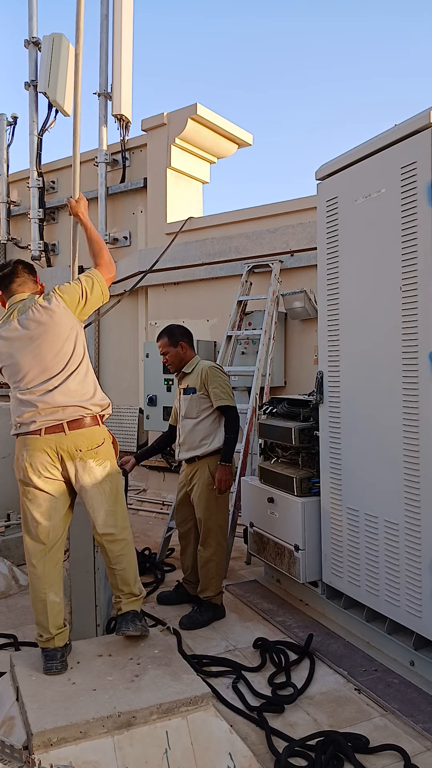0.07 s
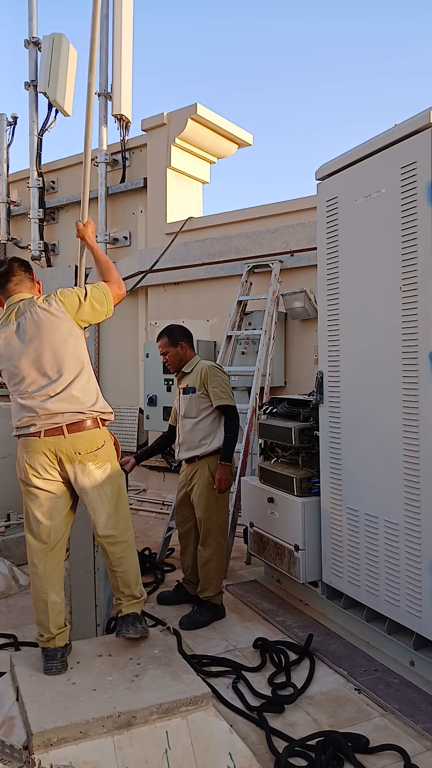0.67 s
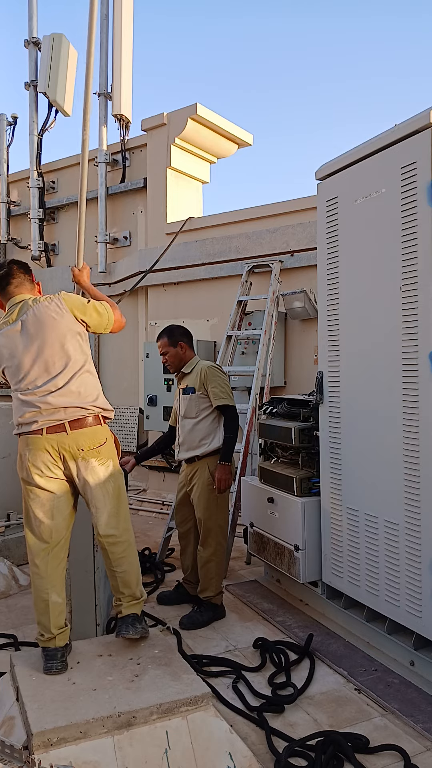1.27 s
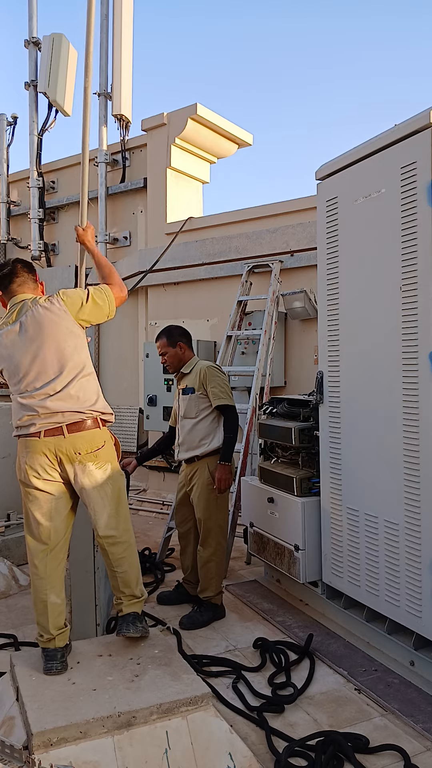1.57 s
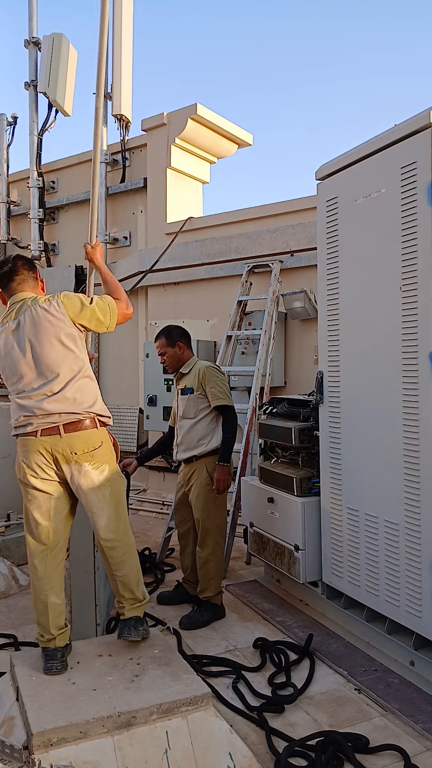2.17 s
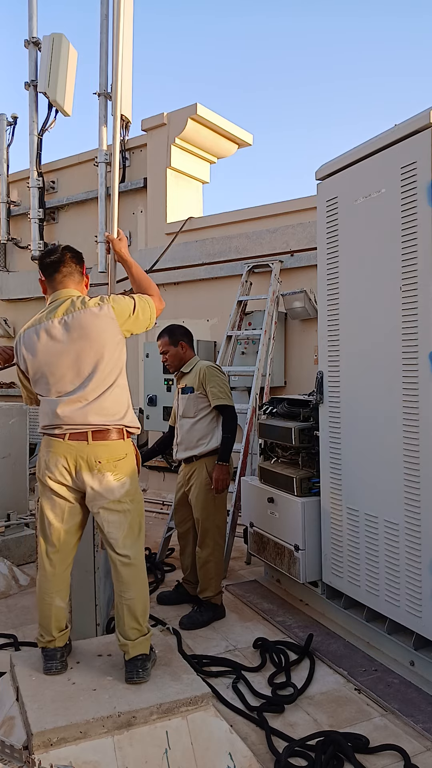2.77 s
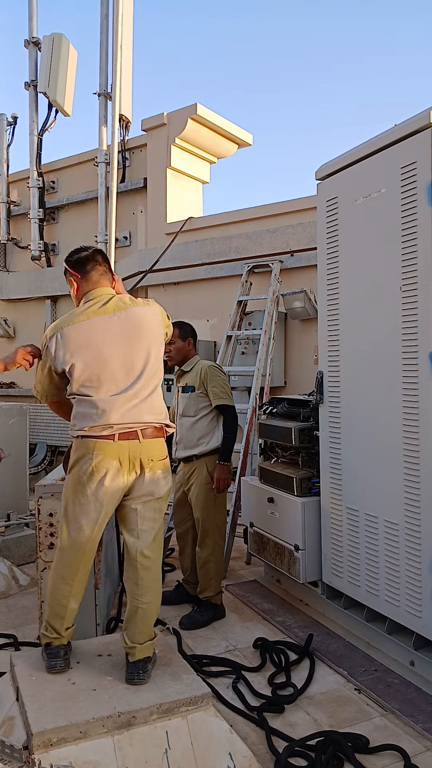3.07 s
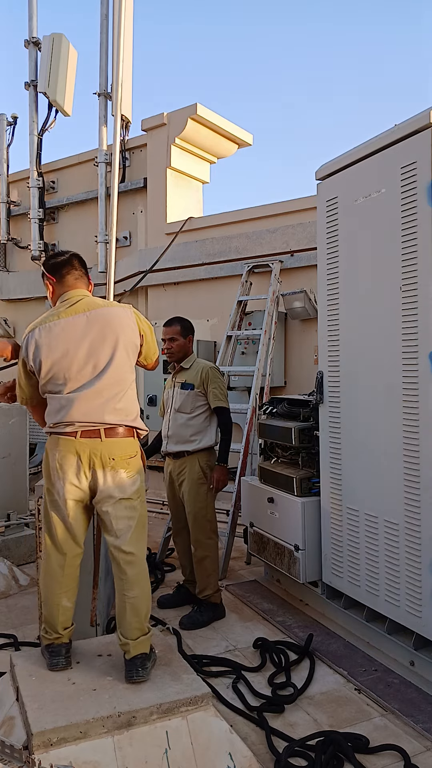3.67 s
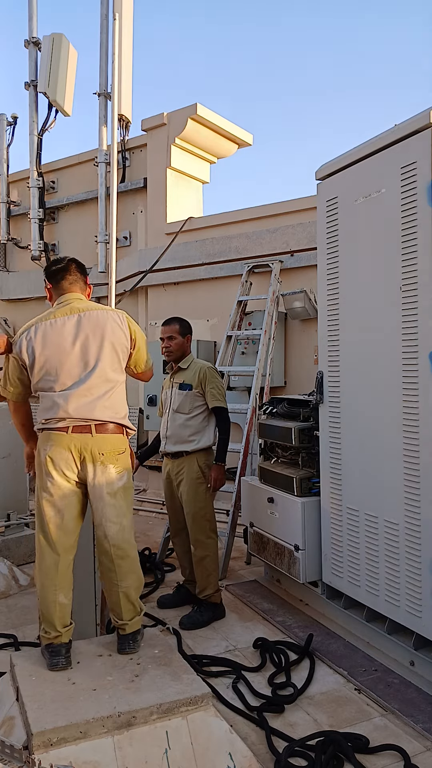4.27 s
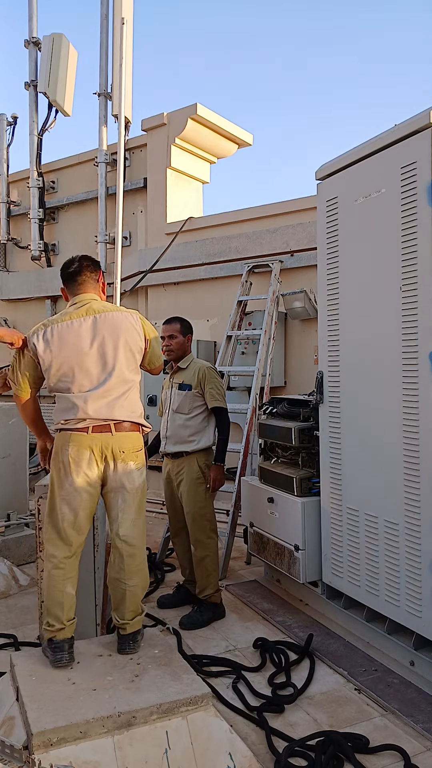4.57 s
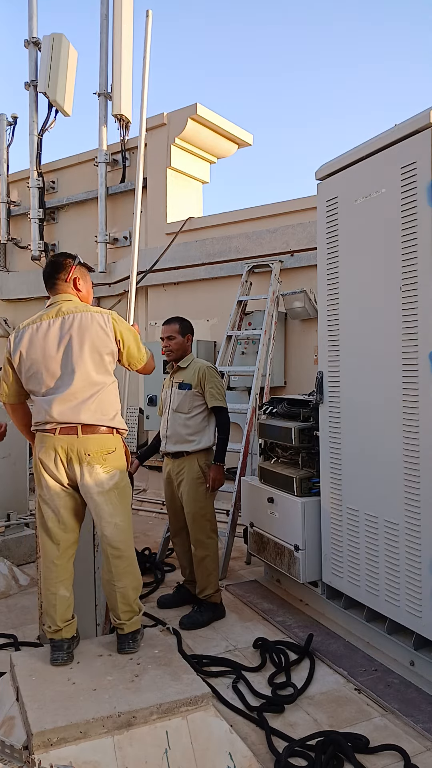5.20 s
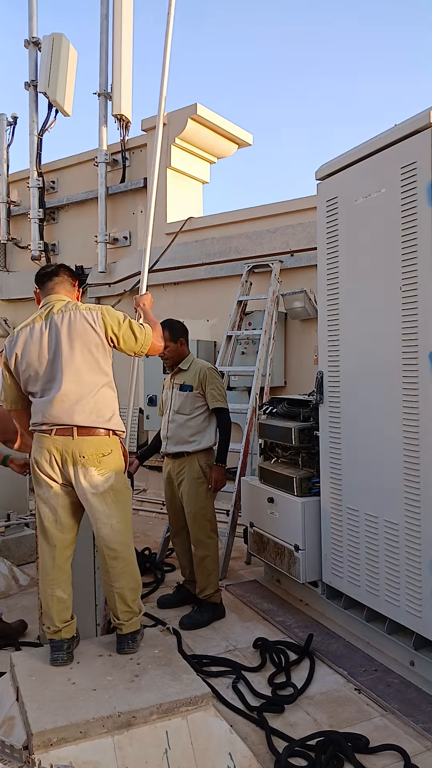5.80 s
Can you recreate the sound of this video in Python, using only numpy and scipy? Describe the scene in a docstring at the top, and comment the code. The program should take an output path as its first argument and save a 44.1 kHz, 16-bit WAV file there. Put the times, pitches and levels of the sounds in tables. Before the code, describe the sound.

Three scraping, clanging thuds of a metal pole on a rooftop, then two rattling knocks, with cooling fans and low wind throughout.

```python
"""A long metal pole is jerked down three times on a walled rooftop. It scrapes and squeals through its
guide, lands with a thud and a clack, sets the mast chattering and makes the roof slab boom.
Later it knocks twice and rattles as it is worked loose; sleeves and hands brush faintly.
Cooling fans and light wind hum throughout, louder in the second half."""
import sys
import numpy as np
from scipy import signal
from scipy.fft import rfft, irfft, next_fast_len
from scipy.io import wavfile
from scipy.ndimage import map_coordinates

SR = 44100
rng = np.random.default_rng(int(sys.argv[2]) if len(sys.argv) > 2 else 0)


def wav_record(signal):
    """Record a signal, one row per channel, as 16-bit PCM in the file named by sys.argv[1]."""
    frames = np.transpose(np.atleast_2d(signal))
    bounded = np.clip(frames, -1, 1)
    # unit amplitude maps onto the largest positive 16-bit level
    quanta = np.round(bounded * 32767).astype(np.int16)
    wavfile.write(sys.argv[1], SR, quanta)


N = 266364
TIME = np.arange(N) / SR
ONE_SECOND = TIME[:SR]


def amp(db):
    """Decibels to gain."""
    return 10 ** (np.asarray(db) / 20)


def along(points, hz):
    """Read a curve of (f/Hz, value) points on a log frequency axis."""
    freqs, values = np.transpose(points)
    return np.interp(np.log(hz + 1), np.log(freqs), values)


def since(start):
    """Seconds since start, zero before."""
    return np.maximum(TIME - start, 0)


def fade(t, t60):
    """Exponential decay, 60 dB down at t60."""
    return np.exp(-np.log(1000) * t / t60)


def rise(t, attack):
    """Exponential attack from 0 towards 1."""
    return 1 - np.exp(-t / attack)


def swell(peak, width):
    """A bell-shaped envelope around the time peak."""
    return np.exp(-((TIME - peak) / width) ** 2)


def add(track, start, x):
    """Mix x into the track at start seconds."""
    part = track[..., round(start * SR):][..., :x.shape[-1]]
    part += x[..., :part.shape[-1]]


def wobble(rate):
    """A smooth random curve, rate knots a second."""
    knots = rng.standard_normal(N // 100)
    return map_coordinates(knots, [TIME * rate], mode="mirror")


def filtered(x, response):
    """EQ x with a gain that is a function of frequency."""
    n = x.shape[-1]
    padded = next_fast_len(n + 8192, real=True)
    hz = np.fft.rfftfreq(padded, 1 / SR)
    return irfft(rfft(x, padded) * response(hz), padded)[..., :n]


# stereo width, near mono in the bass: f/Hz, side minus mid/dB
WIDTH = [(60, -42), (200, -16), (380, -18), (700, -8.5), (1300, -1.5), (2400, 0.5), (15000, 0)]


def stereo(pair, gain):
    """Two unrelated signals become mid and side of an EQ'd left-right pair of rms 1."""
    def mid_side_eq(hz):
        width = amp(along(WIDTH, hz))
        return gain(hz) * np.array([np.ones_like(width), width]) / np.hypot(1, width)
    mid, side = filtered(pair, mid_side_eq)
    out = np.array([mid + side, mid - side])
    return out / np.sqrt(np.mean(out ** 2) + 1e-20)


def noise(spectrum, size=N, grain_db=0):
    """Coloured stereo noise; grain_db roughens it into millisecond grains."""
    grains = np.repeat(rng.standard_normal(size // 64 + 1), 64)[:size]
    gritty = rng.standard_normal((2, size)) * amp(grain_db * grains)
    return stereo(gritty, lambda hz: amp(along(spectrum, hz)))


def resonant_noise(peaks):
    """Stereo noise of rms 1 held in resonant peaks."""
    def gain(hz):
        return sum(amp(db) / np.sqrt(width) / (1 + (2 * (hz - centre) / width) ** 2)
                   for centre, width, db in peaks)
    return stereo(rng.standard_normal((2, N)), gain)


def ring(modes, attack):
    """One second of damped modes, struck once."""
    t = ONE_SECOND
    tones = sum(amp(db) * fade(t, t60) * np.sin(2 * np.pi * hz * t) for hz, db, t60 in modes)
    return tones * rise(t, attack)


def chatter(modes, length, count=12):
    """Modes struck by an even run of light contacts, each at a random phase."""
    out = np.zeros((2, SR))
    hits = (np.linspace(0, length, count) * SR).astype(int)
    for hz, db, t60 in modes:
        kicks = np.zeros((2, SR), complex)
        kicks[:, hits] = np.exp(2j * np.pi * rng.random((2, count)))
        swing = signal.lfilter([1], [1, -fade(1 / SR, t60)], kicks)
        tone = np.real(swing * np.exp(2j * np.pi * hz * ONE_SECOND))
        out += amp(db) * np.sqrt(t60) * tone / np.linalg.norm(swing, axis=1, keepdims=True)
    return stereo(out, np.ones_like) * np.sqrt(length + 0.036)


def damped(x, t60s, hold=0):
    """Each frequency holds, then dies at its own speed."""
    hz, t, bands = signal.stft(x, SR, nperseg=256)
    decay = fade(np.maximum(t - hold, 0), along(t60s, hz)[:, None])
    return signal.istft(bands * decay, SR, nperseg=256)[1][:, :x.shape[1]]


# fader moves of the background bed: t/s, rumble level/dB, rush level/dB
BED_FADERS = [(0, -39.5, -41.5), (1, -35.5, -41.5), (3.05, -35.5, -40), (3.8, -28.5, -31),
              (5.1, -32, -33.5), (6.04, -27, -30)]
# airy fan rush: f/Hz, level/dB
FAN_EQ = [(70, -14), (130, -3), (250, -9), (400, -13.5), (600, -11), (900, -15.5), (1400, -14),
          (2200, -23.5), (3400, -28.5), (4800, -29), (7500, -38), (11000, -43), (16000, -42.5)]
# fan whine: f/Hz, width/Hz, level/dB
FAN_TONES = [(371.2, 18, -10), (219.2, 6.8, -16), (296.5, 16.4, -12), (470.4, 13, -19), (587, 13, -18),
             (1125, 290, -15), (1435, 52, -17.5), (2935, 93, -20.5), (4980, 21, -28), (10090, 360, -33)]
# low wind rumble: f/Hz, level/dB
WIND_EQ = [(13, -69), (22, -45), (43, -17), (58, -16), (70, -1), (87, 0.5), (189, -17.5), (220, -19),
           (290, -41), (480, -120)]


def fans_and_wind():
    """Fans rush and whine over a throbbing low hum and wind rumble."""
    times, *faders = np.transpose(BED_FADERS)
    rumble_db, rush_db = [np.interp(TIME, times, fader) for fader in faders]
    rush_gain = amp(rush_db + 0.25 * wobble(rate=3.8))
    fans = amp(-0.5) * noise(FAN_EQ) + amp(-4.5) * resonant_noise(FAN_TONES)
    hum = amp(-3.5) * resonant_noise([(78.9, 12.0, 0)])
    return rush_gain * fans + amp(rumble_db) * (noise(WIND_EQ) + hum)


# cues for the three jerks, shared by friction and landings: landing t/s, body level/dB, thud f/Hz,
# thud level/dB, chatter length/s, boom lag/s, pull level/dB, squeal hold/s
JERKS = [(.257, -15.5, 424, -3.5, .062, 0.0202, 0, 0.022), (1.184, -16, 468, -11.5, 0.082, 0.0077, 2, .045),
         (1.935, -15, 382, -11, 0.093, .011, -5, 0.064)]
PULL_S, GRIP_S = 0.076, 0.028  # the slide before a landing; the time friction takes to bite
SWELL_DB_PER_S = 236  # friction grows as the pole speeds up
JOLT_LAG_S, JOLT_RISE_S = 0.0038, 0.0097  # the landing throws the pole against its guide


def friction(pull_db, jolt_db, t60, hold_share):
    """Two rubbing envelopes: one swells with each pull; one jumps at the landing, holds and dies."""
    pull, jolt = np.zeros((2, N))
    for landing, *_, effort_db, squeal_s in JERKS:
        bite = np.minimum(since(landing - PULL_S) / GRIP_S, 1) ** 2
        swell_db = SWELL_DB_PER_S * np.minimum(TIME - landing, 0)
        landed = rise(since(landing + JOLT_LAG_S), JOLT_RISE_S)
        pull += (1 - landed) * bite * amp(pull_db + effort_db + swell_db)
        jolt += landed * amp(jolt_db) * fade(since(landing + hold_share * squeal_s), t60)
    return pull, jolt


# gritty scrape: f/Hz, level/dB
SCRAPE_EQ = [(500, 1), (1200, 10.5), (3000, 9.5), (5000, -4), (7000, 5.5), (10000, -15), (12500, -9),
             (16000, -6)]
# piercing squeal: f/Hz, width/Hz, level/dB
SQUEAL_PEAKS = [(4270, 250, 7), (4600, 190, -13), (5060, 890, -3)]
# thin whistle on top: f/Hz, width/Hz, level/dB
WHISTLE_PEAKS = [(12100, 200, 4), (11440, 250, -5), (13100, 2400, 4)]
# squeaks from brief slips in the guide: t/s, level/dB
SLIPS = [(.468, -46.5), (1.371, -36.5), (1.489, -47), (2.038, -28.5)]
SQUEAL_SHARP_HZ = 129  # the squeal is higher while the pole still runs


def slides():
    """The pole scrapes through its guide, which excites its high resonances; short slips squeak."""
    slips = sum(amp(db) * swell(peak, width=0.0077) for peak, db in SLIPS)
    scrape_gain = sum(friction(pull_db=-30.5, jolt_db=-22, t60=0.39, hold_share=0.45))
    whistle_gain = sum(friction(pull_db=-30.5, jolt_db=-30, t60=0.33, hold_share=0.3))
    running, stopping = friction(pull_db=-29.5, jolt_db=-27.5, t60=0.28, hold_share=1)
    sharp_peaks = [(hz + SQUEAL_SHARP_HZ, width, db) for hz, width, db in SQUEAL_PEAKS]
    squeal = running * resonant_noise(sharp_peaks) + (stopping + slips) * resonant_noise(SQUEAL_PEAKS)
    grip = amp(1.4 * wobble(rate=90.3))  # the contact catches and lets go
    scrape = scrape_gain * noise(SCRAPE_EQ, grain_db=2.5)
    whistle = (whistle_gain + amp(-12.5) * slips) * resonant_noise(WHISTLE_PEAKS)
    return scrape + grip * (squeal + whistle)


# short thud of the pole's foot: multiple of thud f, level/dB, t60/s
FOOT_MODES = [(1, 3, 0.035), (1.32, -15, 0.065), (1.85, -18, 0.037)]
# dense body of the hit: f/Hz, level/dB
BODY_EQ = [(60, -26), (100, -3.5), (150, -11.5), (200, -16), (300, -10.5), (420, -10), (700, -12.5),
           (950, -19.5), (1400, -19), (2450, -29), (4000, -34), (8000, -48.5)]
# tail of that body: f/Hz, t60/s
BODY_DECAY = [(120, 0.9), (450, 0.61), (1400, 0.52), (4000, 0.41), (10000, 0.44)]
# clang of pole and mast: f/Hz, level/dB, t60/s
MAST_MODES = [(237.6, -2.5, 0.22), (417, -4.5, 0.58), (577, -9.5, 0.7), (675.5, -4.5, 0.28),
              (740, -10, 0.37), (791, -15, 0.73), (864, -16.5, 0.44), (1245, -11.5, 0.2), (1282, -19, 0.69),
              (1330, -24, 0.57), (1570, -12, 0.27), (1920, -23, 0.27)]
# deep boom of the roof slab: f/Hz, level/dB, t60/s
SLAB_MODES = [(76.5, 3, 0.91), (83, -14.5, 0.33), (62.6, -12, 0.84)]


def landings():
    """The foot thuds, the mast chatters with dense modes, and the slab swells into a boom."""
    out = np.zeros((2, N))
    boom = amp(-9.5) * ring(SLAB_MODES, attack=0.03)
    for start, body_db, thud_hz, thud_db, chatter_s, boom_lag, _, _ in JERKS:
        foot = [(ratio * thud_hz, db, t60) for ratio, db, t60 in FOOT_MODES]
        add(out, start, amp(thud_db) * ring(foot, attack=0.00057))
        body = damped(noise(BODY_EQ, size=SR, grain_db=-0.5), BODY_DECAY, hold=chatter_s)
        body *= rise(ONE_SECOND, attack=0.0045)
        clang = amp(-4) * chatter(MAST_MODES, chatter_s)
        add(out, start, amp(body_db) * (body + clang))
        add(out, start + boom_lag, boom)
    return out


# reverb of the parapet walls, also the tail of the knocks' rattle: f/Hz, t60/s
WALL_DECAY = [(200, 0.54), (2000, 0.28), (6000, .3), (14000, 0.19)]


def contacts(cues, spectrum, attack, t60, wet_db):
    """Brief noise bursts of metal on metal, answered by the parapet walls."""
    envelope, t = np.zeros(N), TIME[:SR // 4]
    for start, db in cues:
        add(envelope, start, amp(db) * fade(t, t60) * rise(t, attack))
    direct = envelope * noise(spectrum)
    tail = damped(rng.standard_normal((2, SR // 2)), WALL_DECAY)
    reverb = signal.fftconvolve(direct, tail / np.linalg.norm(tail[0]), axes=1)[:, :N]
    return direct + amp(wet_db) * reverb


# hard metal hits: t/s, relative level/dB, rebound against the hit/dB
CLACK_CUES = [(0.2666, -16.5, -15), (1.1912, -16.5, -7), (1.944, -26.5, -2), (4.074, -18.5, -20),
              (4.2108, -24.5, -15), (4.255, -23.5, -9), (4.277, -28.5, -16)]
# their bright snap: f/Hz, level/dB
CLACK_EQ = [(400, -25), (1500, 10), (4000, 9.5), (8000, 1), (10500, -1), (13000, 6), (16000, -3)]


def clacks():
    """Bright contacts of metal on metal, each with one quick rebound."""
    flight_s = 0.0107
    hits = [(start, db) for start, db, _ in CLACK_CUES]
    rebounds = [(start + flight_s, db + rebound_db) for start, db, rebound_db in CLACK_CUES]
    return amp(11.5) * contacts(hits + rebounds, CLACK_EQ, attack=0.00058, t60=0.014, wet_db=0.5)


# light settling taps: t/s, relative level/dB
TAP_CUES = [(.46, -33), (1.380, -37), (1.469, -42.5), (1.484, -42), (4.286, -27)]
# their midrange tick: f/Hz, level/dB
TAP_EQ = [(300, -24), (1200, 7), (3200, 3), (4500, -4), (7000, -10), (10000, -28), (16000, -26)]


def taps():
    """Softer, duller contacts as the pole settles."""
    return amp(9.0) * contacts(TAP_CUES, TAP_EQ, attack=0.0048, t60=0.08, wet_db=-7.0)


# cloth moves: peak t/s, half width/s, level/dB
SWISH_CUES = [(2.76, 0.12, -63), (5.14, 0.075, -52.5), (5.3, .05, -55), (5.85, 0.3, -53)]
# soft, high cloth hiss: f/Hz, level/dB
CLOTH_EQ = [(3000, -25), (7000, -3), (10500, 2), (13000, -2), (16000, -6)]


def clothes():
    """Sleeves and hands brush in faint, grainy swishes."""
    envelope = sum(amp(db) * swell(peak, width) for peak, width, db in SWISH_CUES)
    return envelope * noise(CLOTH_EQ, grain_db=3.0)


# working the pole loose: t/s, relative thud level/dB, ring level/dB, rattle level/dB, rattle length/s
KNOCK_CUES = [(4.067, -4, -23, -20, 0.038), (4.205, -10, -25.5, -22.5, 0.076)]
# dull sideways blow: f/Hz, level/dB, t60/s
KNOCK_MODES = [(263.8, 0, 0.077), (154, -6, 0.097), (495, -5.5, 0.034)]
# bright ring of the free pole: f/Hz, level/dB, t60/s
TUBE_MODES = [(1413, 1, 0.34), (1467, -2.5, 0.27), (1630, -10, .25), (1920, 2, 0.23), (2150, -6, 0.2),
              (2662, 2.5, 0.24), (3020, 0, 0.091), (3820, -18, 0.28), (4240, -7, 0.36), (4300, -19, 0.27),
              (6304, -23, .25), (7381, -10.5, .25), (8650, -15, .16), (12000, -23, .2)]
# rattle in the guide: f/Hz, level/dB
RATTLE_EQ = [(120, -36), (200, -2), (273, -1.5), (646, -17), (1200, -9.5), (1440, -4.5), (1870, -8),
             (2460, -13.5), (2640, -17), (2790, -9.5), (7100, -20), (10100, -33), (13000, -47),
             (15900, -32)]


def knocks():
    """Two dull sideways blows, each setting the tube ringing and rattling in its guide."""
    out = np.zeros((2, N))
    for start, thud_db, ring_db, rattle_db, rattle_s in KNOCK_CUES:
        thud = amp(thud_db + 3.5) * ring(KNOCK_MODES, attack=0.0037)
        rattle = damped(noise(RATTLE_EQ, size=SR, grain_db=1), WALL_DECAY, hold=rattle_s)
        rattle *= amp(rattle_db) * rise(ONE_SECOND, attack=0.00098)
        tube = amp(ring_db) * chatter(TUBE_MODES, rattle_s)
        add(out, start, thud + tube + rattle)
    return out


def scene():
    """The pole and its handling over the bed of fans and wind."""
    return landings() + knocks() + slides() + clacks() + taps() + clothes() + fans_and_wind()


# pan by frequency: f/Hz, left minus right/dB
PORT_BALANCE = [(60, -2), (200, -1.5), (380, -3), (700, -4), (1250, -10.5), (2400, -5.5), (3400, -5),
                (4400, -7.5), (5800, -0.5), (7200, -1.5), (7900, 7), (9500, 0), (11500, -4), (13000, -4),
                (15000, -7)]
LOW_CUT_HZ, TOP_HZ = 30, 15850


def record(dry):
    """Two microphone ports colour each side and shed deep bass; then a soft clip and a high cut."""
    def ports(hz):
        balance = amp(np.outer([0.5, -0.5], along(PORT_BALANCE, hz)))
        return balance * hz ** 2 / np.hypot(hz ** 2, LOW_CUT_HZ ** 2)
    coloured = filtered(dry, ports)
    rounded = coloured / (1 + np.abs(coloured) ** 6) ** (1 / 6)
    return filtered(rounded, lambda hz: hz < TOP_HZ)


dry = scene()
out = record(dry)
wav_record(out)
```